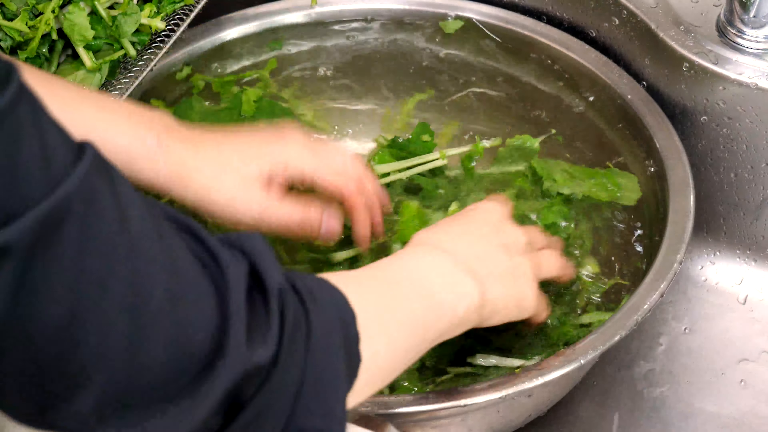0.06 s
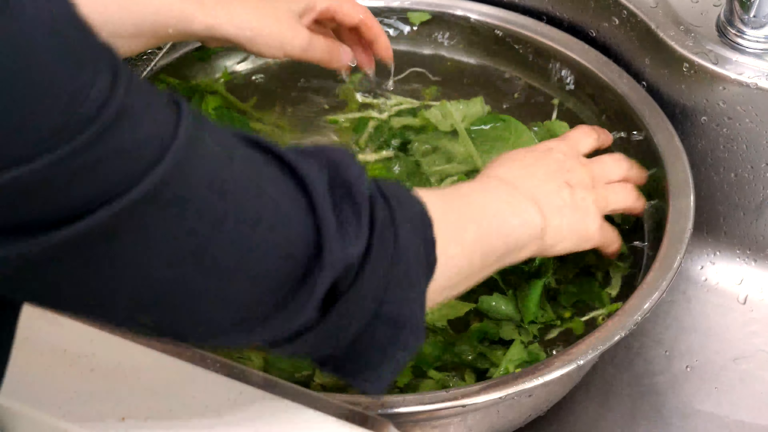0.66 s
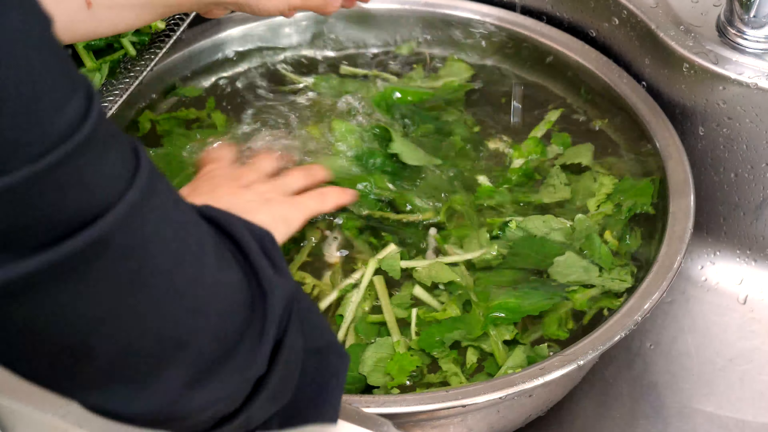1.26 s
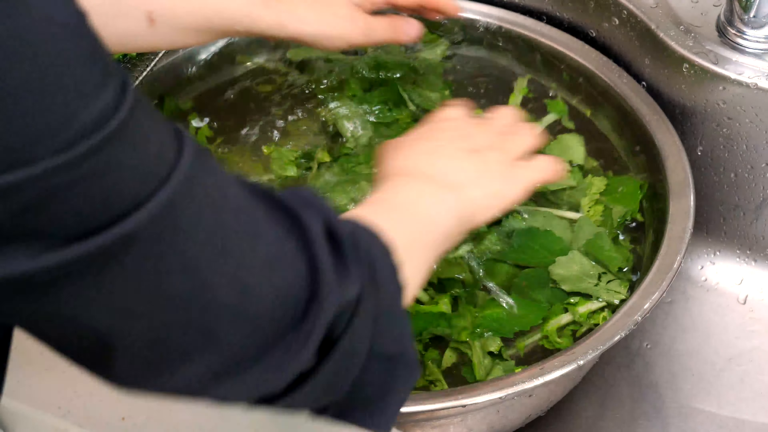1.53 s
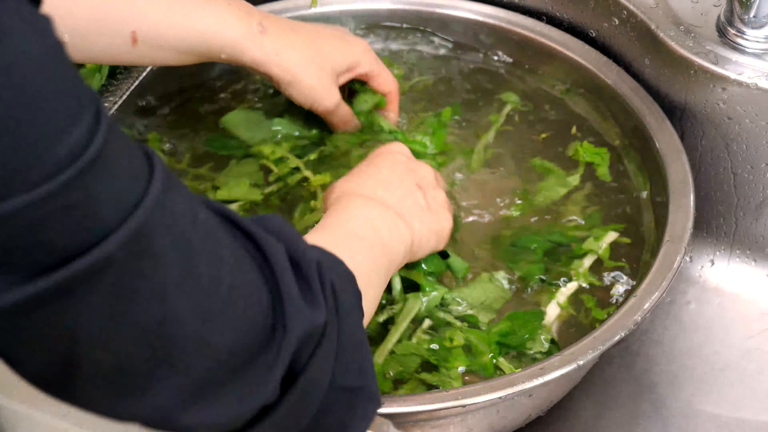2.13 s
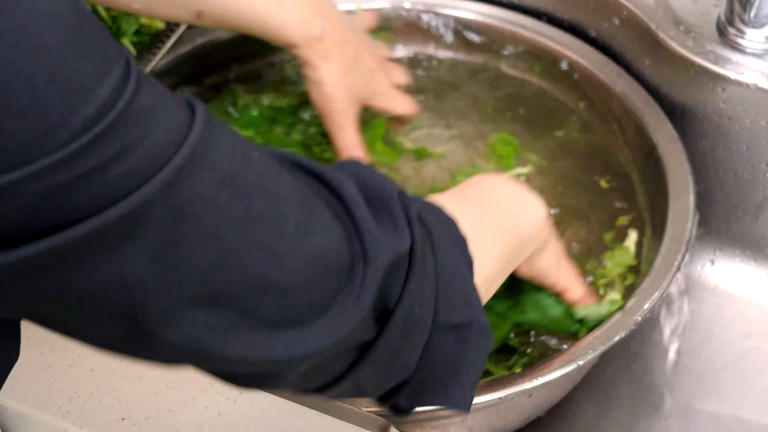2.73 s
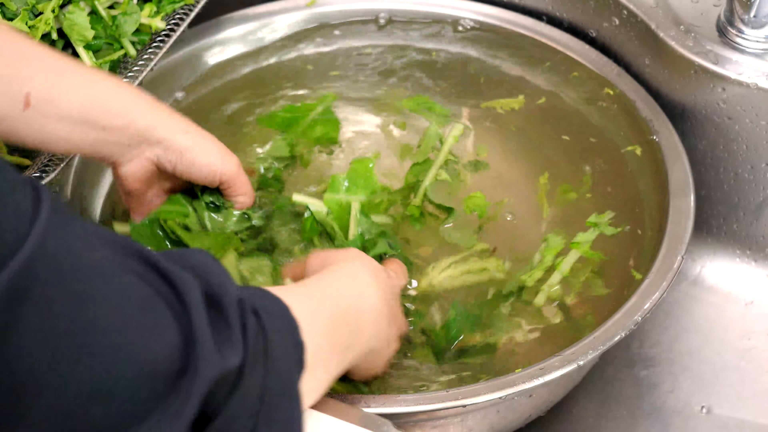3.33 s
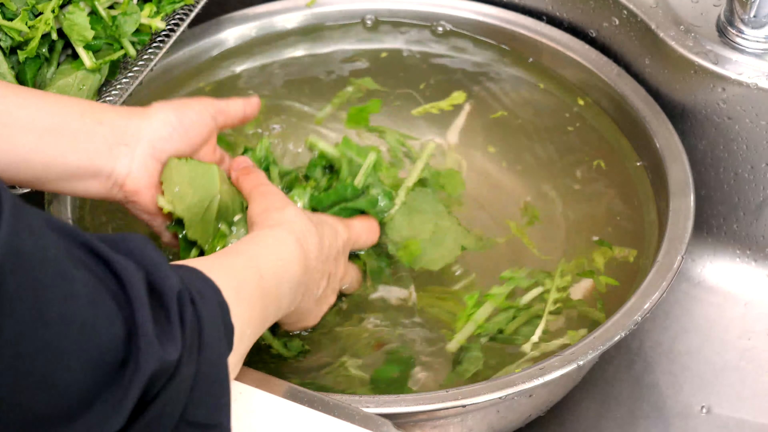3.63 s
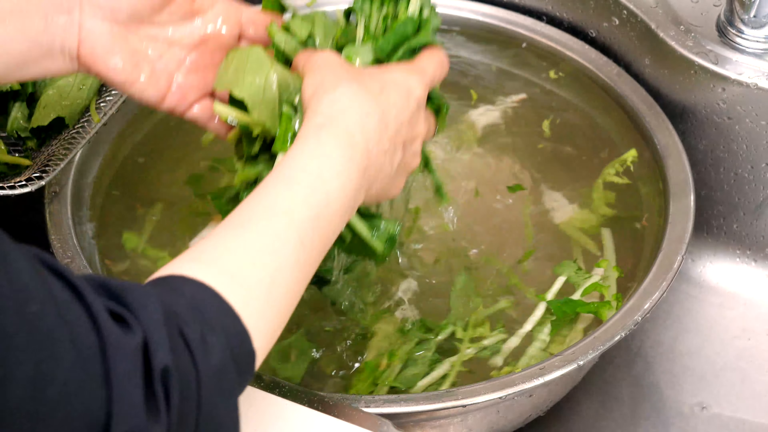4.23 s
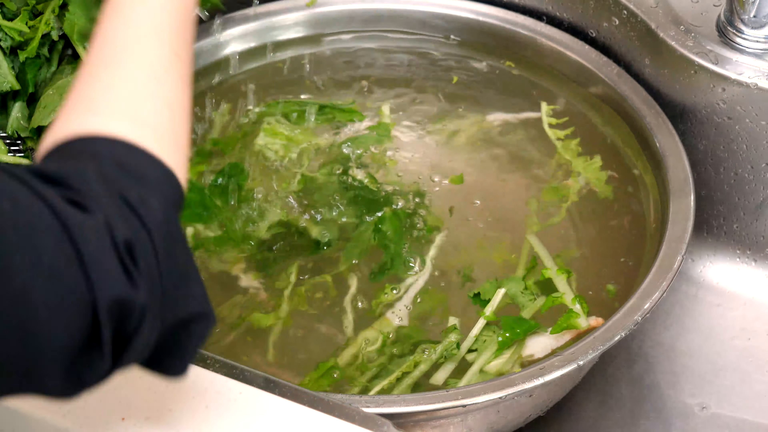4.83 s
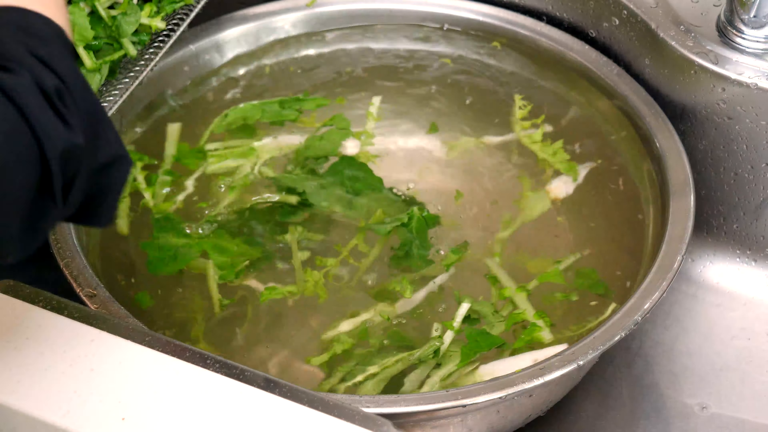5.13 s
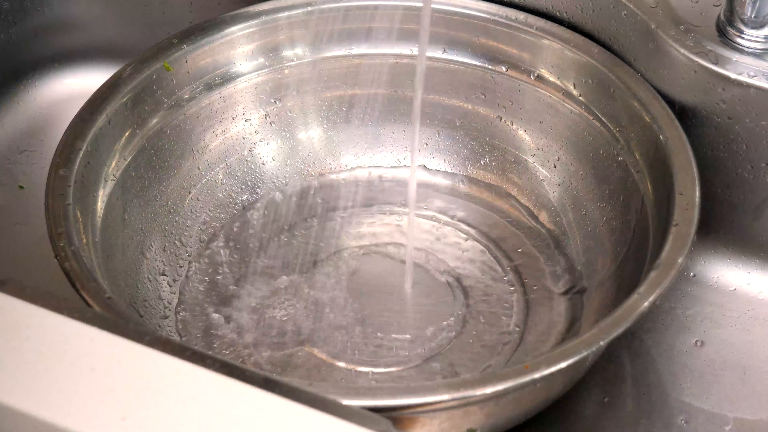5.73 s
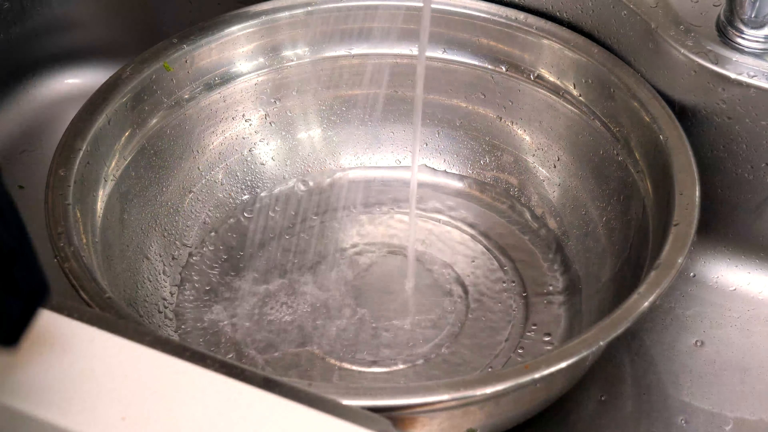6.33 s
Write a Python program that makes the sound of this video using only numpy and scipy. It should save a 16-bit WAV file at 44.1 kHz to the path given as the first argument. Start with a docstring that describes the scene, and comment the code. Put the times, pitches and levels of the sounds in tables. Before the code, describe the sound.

Close splashing, plopping and dripping as greens are washed by hand, switching abruptly to tap water drumming on a metal bowl.

```python
"""Kitchen sink, close, nearly mono: hands swish leafy greens in a steel bowl of water, then lift a
dripping bunch out. Trapped air rings as bubbles, the loudest plops clipping; spray ticks on leaves
and steel; the moving water rumbles in the bowl. Then, abruptly, a tap runs into the emptied bowl
and drums on its bottom."""
import sys
import numpy as np
from scipy import signal
from scipy.fft import rfft, irfft, next_fast_len
from scipy.io import wavfile
from scipy.ndimage import uniform_filter1d

SR = 44100
rng = np.random.default_rng(int(sys.argv[2]) if len(sys.argv) > 2 else 0)


def to_wav(sig):
    """Store sig (one row per channel, or 1-D mono) as 16-bit WAV at the path in sys.argv[1].

    Samples outside -1..1 are clipped; the rate is SR.
    """
    pcm = np.clip(np.atleast_2d(sig), -1, 1) * 32767
    pcm = np.round(pcm).astype(np.int16)
    wavfile.write(sys.argv[1], SR, pcm.T)  # frames by channels


N = 285327
TIME_S = np.arange(N) / SR
FREQS_HZ = np.maximum(np.fft.rfftfreq(next_fast_len(N), 1 / SR), 1)
TAP_ON_S = 5.353

# Table levels are relative.
# loudest bubbles: t/s, f/Hz, level/dB, swell/cycles
PLOPS = [(0.03, 2700, -17.5, 8.9), (0.362, 639, -13.5, 4), (0.396, 880, -15.5, 5.3), (0.449, 1350, -18, 10),
         (0.497, 3580, -9, 11.5), (0.509, 2190, -0.5, 0.81), (0.514, 1286, -9, 8), (0.613, 3466, -13.5, 20),
         (0.865, 3470, -7, 4), (0.885, 769, -10, 5), (0.933, 1127, -1, 2.7), (0.952, 1030, -18, 10),
         (1.015, 2530, -3.5, 3.5), (1.079, 868, -8, 1.6), (1.082, 1923, -2, 5.3), (1.091, 2910, -12.5, 7.3),
         (1.146, 3900, -10, 7), (1.185, 534, -10, 2.2), (1.199, 610, -7, 2.9), (1.238, 992, -8.5, 5),
         (1.275, 3320, -5, 4.7), (1.36, 735, -10, 1.64), (1.362, 3550, -4, 7.6), (1.41, 1059, -14, 17),
         (1.454, 642, -12.5, 5), (1.498, 1395, -5, 4.9), (1.575, 713, -10.5, 4.3), (1.665, 2530, -7, 2.2),
         (1.687, 3230, -9, 4.6), (1.712, 3670, -10.5, 5.3), (1.858, 2940, -5.5, 4),
         (1.969, 1220, -11.5, 1.9), (2.094, 3420, -12, 2), (2.14, 1860, -13.5, 4.6),
         (2.181, 4130, -10.5, 4.8), (2.47, 3330, -9.5, 5), (2.53, 3260, -11, 11), (2.546, 1550, -10, 4),
         (2.617, 4430, -11, 1.8), (2.638, 3700, -11.5, 10), (2.767, 1670, -16, 3),
         (2.808, 2510, -13.5, 2.2), (3.011, 2105, -6, 3.7), (3.033, 3570, -6.5, 2.95),
         (3.599, 1910, -14.5, 9), (3.608, 2850, -11, 10.8), (3.842, 1100, -17, 6.05),
         (4.065, 2254, -7, 7.2), (4.09, 3410, -8.5, 13), (4.184, 3870, -4.5, 8.2), (4.197, 1369, -4, 10),
         (4.237, 751, -8.5, 9.2), (4.254, 3900, -7, 4.3), (4.324, 666, -11, 8.2), (4.357, 661, -6, 6.6),
         (4.378, 3950, -6, 4.7), (4.406, 1102, -8, 5.1), (4.423, 4020, 2.5, 4.5), (4.649, 3890, -12, 15),
         (4.703, 2720, -10.5, 12), (4.755, 1490, -5, 2.34), (4.769, 1145, -6, 4.88),
         (4.781, 1110, -12.5, 10), (4.827, 2276, -10, 11), (4.834, 3144, -5, 4.8), (4.844, 3990, -4, 4.9),
         (4.941, 1330, -7, 3.07), (4.952, 1420, -5.5, 2.92)]
# hand swishes, gushes off the bunch: t/s, hold/s, gurgle/dB, splash/dB, spray/dB
HAND_SWISHES = [(0.0, 0.042, -29, -28.5, -37), (.32, 0.16, -25.5, -37, -34.5),
                (.5, 0.035, -23.5, -22.5, -31), (.83, .14, -23.5, -28.5, -35.5),
                (.87, 0.03, -41, -21.5, -26.5), (1.04, 0.094, -19, -23, -33), (1.19, 0.13, -20, -30.5, -34),
                (1.36, 0.075, -18.5, -18, -29), (1.5, 0.086, -21, -30, -33),
                (1.69, 0.027, -27, -25.5, -25.5), (1.84, 0.044, -24.5, -21, -25.5),
                (1.97, 0.012, -33, -42, -45), (2.1, 0.11, -39, -31, -53), (2.43, 0.048, -22, -33, -31),
                (2.53, 0.11, -26.5, -26, -34), (2.86, 0.029, -27.5, -30, -32),
                (3.21, 0.043, -33.5, -26.5, -35), (3.4, 0.0071, -24.5, -31, -69),
                (3.55, 0.034, -25.5, -28.5, -47), (3.67, 0.052, -21, -42, -49),
                (3.85, 0.043, -22, -28, -37), (4.05, 0.055, -28, -19.5, -23.5),
                (4.18, 0.22, -24, -19, -24.5), (4.58, 0.025, -27.5, -47, -31.5),
                (4.78, 0.063, -30, -26, -27.5), (4.95, 0.077, -31, -33, -29)]
# leaves rubbing and dripping between swishes: t/s, level/dB
LEAF_HANDLING = [(0.0, -41.5), (.2, -37.5), (.6, -27.5), (.78, -49), (1.0, -33), (2.0, -31), (2.75, -33),
                 (3.5, -30.5), (4.0, -25), (4.5, -24), (4.88, -34.5), (5.33, -28.5)]
# drops on leaves and steel: t/s, tick/dB, smack/dB
DROP_SLAPS = [(0.304, -17.5, -18.5), (0.3292, -17, -16), (0.542, -20, -31), (0.6125, -13, -13.5),
              (0.6894, -11, -19), (0.836, -13, -22), (0.864, -17, -19), (1.0124, -12.5, -11.5),
              (1.0476, -15, -35), (1.192, -15.5, -15), (1.361, -21, -19), (1.6854, -6.5, -18.5),
              (1.774, -32, -19), (1.857, -26, -9), (1.8932, -10.5, -27), (1.969, -32, -22.5),
              (2.0598, -40, -24), (2.0997, -19, -18.5), (2.156, -27, -34), (2.3083, -37, -23.5),
              (2.4477, -17, -43), (2.5474, -27, -18), (2.6163, -15, -13), (2.768, -41, -25),
              (2.855, -16, -25), (2.951, -13, -20.5), (3.012, -19.5, -13), (3.0334, -39, -27),
              (3.1338, -33, -20), (3.2119, -19, -19.5), (3.517, -37, -23.5), (3.609, -29, -20),
              (3.704, -18.5, -42), (3.8407, -14, -40), (4.165, -5.5, -16), (4.2934, -7, -19),
              (4.585, -18, -27), (4.6744, -16, -22), (4.7027, -34, -18.5), (4.737, -12.5, -43),
              (4.9142, -12.5, -26), (4.94, -13.5, -18.5), (5.0355, -6.5, -47), (5.1343, -15, -47)]
# arms shoving the water: t/s, hold/s, slosh/dB, surge/dB
ARM_SHOVES = [(.2, 0.29, -44, -26.5), (.71, 0.048, -36, -31), (.89, .03, -27, -43), (1.22, 0.087, -31, -35),
              (1.7, 0.085, -26.5, -31), (1.98, .08, -35, -31), (2.23, .09, -36, -40),
              (2.85, 0.14, -26, -30), (3.2, 0.2, -24, -39), (3.52, 0.065, -26, -28),
              (4.78, 0.069, -30, -43), (4.99, 0.07, -43, -37)]
# heave of the water: t/s, level/dB
WATER_HEAVE = [(0.0, -33.5), (.5, -30.5), (1.0, -40.5), (1.6, -35), (2.0, -31.5), (2.7, -28), (3.3, -29),
               (4.0, -26), (4.45, -36.5), (4.7, -32.5), (5.33, -24)]
# hands bumping the full bowl: t/s, f/Hz, level/dB
BOWL_BUMPS = [(0.22, 67, -36), (1.112, 70, -20), (1.639, 61.6, -19), (2.21, 63, -11.5), (2.859, 123, -14),
              (3.776, 118, -14.5), (3.928, 118, -15)]
# modes of the emptied bowl: f/Hz, width/Hz, level/dB
EMPTY_BOWL_MODES = [(157.6, 8, -24.5), (207, 18, -43), (260, 6.3, -36.5), (453, 13, -29.5),
                    (504, 31, -31.5), (805, 80, -37.5), (2588, 38, -37.5), (3400, 250, -33),
                    (3715, 78, -31.5), (3964, 110, -32), (4380, 200, -32.5), (5060, 140, -40)]
# jet sputters: t/s, level/dB
JET_SPUTTERS = [(5.3803, -8.5), (5.45, -10), (5.5772, -7), (5.6045, -5), (5.728, -15), (5.8862, -4),
                (5.9234, -11), (6.142, -7.5), (6.2286, -8), (6.273, -3), (6.389, -8)]

# spectra: f/Hz, level/dB
CHURN_EQ = [(300, -26), (600, -13.5), (1300, 1), (1800, -3.5), (2800, -36)]  # stirred water
RUSTLE_EQ = [(900, -30), (1700, -2.5), (2600, -1.5), (3800, 4.5), (4500, -3.5), (6000, -19.5)]  # wet leaves
SPRAY_EQ = [(1200, -13), (2500, -22), (4000, -0.5), (5200, -0.5), (7500, -2), (11000, -3.5), (15500, -10.5)]  # fine drops
SMACK_EQ = [(400, -14), (1200, -9), (2500, 1), (3800, 7), (4500, -0.5), (6000, -16)]  # dull part of a slap
SLOSH_EQ = [(70, -43), (100, 2), (140, -11.5), (200, 0), (260, 0), (330, -8.5), (500, -7.5), (900, -40),
            (2000, -46)]  # water against the wall
SURGE_EQ = [(15, -40), (28, 1), (42, 2.5), (62, 7.5), (85, 8.5), (120, -29)]  # deep rocking
JET_EQ = [(18, -51), (30, -29), (53, -8), (97, -14), (156, 1), (299, -21), (467, -7), (673, -20),
          (852, -11), (996, -18.5), (1910, -24), (3780, -18), (4780, -24.5), (9680, -19.5), (15500, -20.5)]  # jet on steel
BASIN_EQ = [(650, -18), (1050, -3), (1500, -4), (2200, -7), (3000, -22)]  # air in the bowl
KITCHEN_EQ = [(18, -39), (30, -11), (113, 11), (167, -40), (698, 22), (2770, -52), (3590, 12), (4900, -38),
              (15000, -49)]  # room noise
SIDE_EQ = [(30, -17), (125, -31), (250, -15.5), (1000, -24.5), (2000, -28), (4000, -24.5), (8000, -18)]  # left-right difference
SPUTTER_EQ = [(1500, -17.5), (3000, -9.5), (3700, 7.5), (4300, -6), (5200, -5.5), (12000, -20)]


def plops(main_db, linger_db, shed_db, shed_count):
    """Plunging hands and falling water trap large bubbles; each lingers and sheds lesser ones."""
    out = np.zeros(N)
    for (s, hz, db, swell), shed in zip(PLOPS, rng.random((len(PLOPS), shed_count, 2))):
        swell = max(swell, 0.5)
        fade = 3.7 * (hz / 1000) ** 0.31  # cycles
        add(out, s, undb(db + main_db) * bubble(hz, swell, fade, glide=0.035))
        linger = bubble(hz, fade, 2.9 * fade, glide=0.012)
        add(out, s + (swell + fade) / hz, undb(db + linger_db) * linger)
        for late, scatter in shed:  # later fragments: smaller, weaker
            octaves = 0.69 * (scatter - 0.5) + 0.35 * late
            fragment = bubble(hz * 2 ** octaves, swell_cycles=1, fade_cycles=2.7, glide=0.022)
            add(out, s + (swell + 32 * late) / hz, undb(db + shed_db - 17.5 * late) * fragment)
    return out


def bubble(hz, swell_cycles, fade_cycles, glide):
    """An air pocket swells as it pinches off, then rings down, rising in pitch near the surface."""
    cycle = np.arange(int((swell_cycles + 6 * fade_cycles) * SR / hz)) * hz / SR
    after = cycle - swell_cycles
    envelope = np.minimum(cycle / swell_cycles, 1) * np.exp(-np.maximum(after, 0) / fade_cycles)
    bend = glide * after ** 2 / (2 * (swell_cycles + fade_cycles))
    return envelope * np.sin(2 * np.pi * (cycle + bend))


def swishing():
    """Stirred leaves fold air into the water, rub together and flick off spray."""
    handling = np.outer(undb([-0.5, -1, -9]), gain_curve(LEAF_HANDLING))
    swishes = strokes(HAND_SWISHES, attack_s=0.036, release_s=0.032)
    gurgle, splash, spray = np.hypot(handling, swishes)
    huge = swarm(low_hz=554, high_hz=909, fade_cycles=7.4, spread_db=7, count=700)
    large = swarm(low_hz=777, high_hz=1914, fade_cycles=4.6, spread_db=9.5, count=1600)
    small = swarm(low_hz=1756, high_hz=4520, fade_cycles=8.9, spread_db=8, count=2600)
    fizz = swarm(low_hz=4800, high_hz=14500, fade_cycles=12, spread_db=5, count=1300)
    churn = crackle(CHURN_EQ, per_s=2500, spread_db=6)
    rustle = crackle(RUSTLE_EQ, per_s=2000, spread_db=-0.5)
    mist = crackle(SPRAY_EQ, per_s=1500, spread_db=1)
    # trapping air takes vigour, the biggest pockets most
    vigour = np.minimum((gurgle + splash) / undb(-18.5), 1) ** 0.64
    glug = np.minimum(gurgle / undb(-15), 1)
    return (gurgle * (undb(-4) * glug * huge + undb(-8.5) * vigour * large + undb(-7) * churn)
            + splash * (undb(-1.5) * vigour * small + undb(-4) * rustle)
            + spray * (undb(-4.5) * fizz + undb(-2.83) * mist))


def swarm(low_hz, high_hz, fade_cycles, spread_db, count):
    """Bubbles of mixed size and depth, rms 1."""
    out = np.zeros(N)
    for (when, pitch, depth), loud in zip(rng.random((count, 3)), rng.standard_normal(count)):
        hz = low_hz * (high_hz / low_hz) ** pitch
        ring = bubble(hz, 0.73, fade_cycles * (0.5 + depth), glide=0.02)
        add(out, when * N / SR, undb(spread_db * loud) * ring)
    return even(out, span_s=0.057)


def crackle(eq, per_s, spread_db):
    """Dense wet clicks in small flurries, rms 1."""
    flurries = undb(5.1 * walk(rate_hz=97))
    return even(colour(patter(per_s, spread_db) * flurries, eq), span_s=0.058)


def slaps(crack_s, tick_decay_s, smack_decay_s, tail_db):
    """Each drop bursts into a bright tick, a duller smack and the ping of a tiny bubble."""
    ticks, smacks, pings = np.zeros((3, N))
    t = TIME_S[:2048]
    crack = np.exp(-t / crack_s)
    tick_envelope = crack + undb(tail_db) * np.exp(-t / tick_decay_s)
    smack_envelope = crack + undb(tail_db) * np.exp(-t / smack_decay_s)
    ping_hz = 5360 * (9580 / 5360) ** rng.random(len(DROP_SLAPS))
    noises = rng.standard_normal((len(DROP_SLAPS), 2, len(t)))
    for (s, tick_db, smack_db), hz, noise in zip(DROP_SLAPS, ping_hz, noises):
        add(ticks, s, undb(tick_db) * noise[0] * tick_envelope)
        add(smacks, s, undb(smack_db) * noise[1] * smack_envelope)
        add(pings, s, undb(tick_db) * bubble(hz, swell_cycles=1, fade_cycles=20, glide=0.013))
    return (undb(-4.5) * colour(ticks, SPRAY_EQ) + undb(6.5) * colour(smacks, SMACK_EQ)
            + undb(-8.5) * pings)


def tap():
    """An aerated jet spatters on bare steel and drums the bowl's modes; stray drops tick on the wall."""
    impacts = patter(per_s=9000, spread_db=4.5) * undb(2.4 * walk(rate_hz=110))
    spatter = even(colour(impacts, JET_EQ), span_s=0.224)
    # sputters drive the modes harder
    pushes = [(s, 0.012, db + 11.5) for s, db in JET_SPUTTERS]
    drive = 4 + strokes(pushes, attack_s=0.025, release_s=0.016)[0]
    ring = np.zeros(N)
    for hz, width_hz, db in EMPTY_BOWL_MODES:
        drumming = drive * patter(per_s=900, spread_db=6)
        ring += undb(db) * even(resonate(drumming, hz, width_hz), span_s=0.34)
    ticks = even(colour(patter(per_s=500, spread_db=4), SPRAY_EQ), span_s=0.17)
    running = np.clip((TIME_S - TAP_ON_S) / 0.0024, 0, 1)
    return running * (undb(-17.5) * spatter + undb(-27.5) * ticks + undb(-0.5) * ring)


def sputters(decay_s, gain_db):
    """Drops flung by the jet ring the steel near 3.7 kHz."""
    out, t = np.zeros(N), TIME_S[:4096]
    for s, db in JET_SPUTTERS:
        add(out, s, undb(db + gain_db) * rng.standard_normal(len(t)) * np.exp(-t / decay_s))
    return colour(out, SPUTTER_EQ)


def sloshing():
    """Heaving water pushes unevenly on the full bowl, which booms at its lowest mode."""
    slosh, surge = strokes(ARM_SHOVES, attack_s=0.037, release_s=0.017)
    slosh = np.hypot(slosh, gain_curve(WATER_HEAVE))
    surge = np.hypot(surge, undb(-36))  # rocks on between shoves
    wall = even(colour(patter(per_s=260, spread_db=4), SLOSH_EQ), span_s=0.18)
    boom = even(resonate(rng.standard_normal(N), hz=118, width_hz=10), span_s=0.2)
    deep = even(colour(rng.standard_normal(N), SURGE_EQ), span_s=0.072)
    return slosh * (undb(-5.5) * wall + undb(-1) * boom) + undb(-2.5) * surge * deep


def bumps():
    """Hands bump the full bowl, which thuds: low damped sines."""
    out = np.zeros(N)
    for s, hz, db in BOWL_BUMPS:
        add(out, s, undb(db) * bubble(hz, swell_cycles=0.29, fade_cycles=2.3, glide=0))
    return out


def basin(x, gain_db, t60_s):
    """Plops ring on between the steel walls."""
    ring = signal.oaconvolve(x, tail(delay_s=0.01, t60_s=t60_s))[:N]
    return undb(gain_db) * colour(ring, BASIN_EQ)


def echoes(x, places):
    """The sink answers first, the kitchen later; each place a splash lands has its own echoes."""
    place = rng.integers(places, size=N // 1024 + 1).repeat(1024)[:N]
    out = np.zeros(N)
    for k in range(places):
        sink = undb(-8) * tail(delay_s=0.0027, t60_s=0.046)
        kitchen = undb(-11) * tail(delay_s=0.012, t60_s=0.17)
        share = uniform_filter1d(1.0 * (place == k), size=256)
        out += signal.oaconvolve(x * share, sink + kitchen)[:N]
    return signal.sosfilt(signal.butter(1, [350, 12000], "band", fs=SR, output="sos"), out)


def stereo_width(mid, lag_s):
    """A faint, fluttering left-right difference that slightly widens the nearly mono sound."""
    delayed = np.interp(TIME_S - lag_s, TIME_S, mid)
    return colour(delayed * walk(rate_hz=40), SIDE_EQ)


def kitchen_noise():
    """Faint steady room noise."""
    return undb(-53) * unit(colour(rng.standard_normal(N), KITCHEN_EQ))


def strokes(table, attack_s, release_s):
    """Movements build, hold and settle; one gain curve per dB column, overlaps adding in power."""
    power = 0
    for s, hold_s, *db in table:
        age_s = TIME_S - s
        envelope = np.exp(np.minimum(age_s, 0) / attack_s - np.maximum(age_s - hold_s, 0) / release_s)
        power = power + np.outer(undb(db), envelope) ** 2
    return np.sqrt(power)


def patter(per_s, spread_db):
    """Randomly timed impacts of varied size."""
    hits = rng.random(N) < per_s / SR
    return hits * rng.choice([-1, 1], N) * undb(spread_db * rng.standard_normal(N))


def tail(delay_s, t60_s):
    """Diffuse echo, unit energy."""
    t = TIME_S[:SR // 2]
    echo = rng.standard_normal(len(t)) * undb(-60 * t / t60_s) * (t > delay_s)
    return echo / np.sqrt(np.sum(echo ** 2))


def walk(rate_hz):
    """Smooth random wander, rms 1."""
    knots = rng.standard_normal(2048)
    return unit(np.interp(TIME_S * rate_hz, np.arange(len(knots)), knots))


def resonate(x, hz, width_hz):
    """One resonance, rms 1."""
    return unit(signal.lfilter(*signal.iirpeak(hz, hz / width_hz, fs=SR), x))


def colour(x, eq):
    """Filter by an (f/Hz, level/dB) spectrum."""
    hz, db = np.transpose(eq)
    size = next_fast_len(N)
    response = undb(np.interp(np.log(FREQS_HZ), np.log(hz), db))
    return irfft(rfft(x, size) * response, size)[:N]


def gain_curve(table):
    """(t/s, level/dB) to gain per sample."""
    s, db = np.transpose(table)
    return undb(np.interp(TIME_S, s, db))


def even(x, span_s):
    """Rms 1 over each span_s; quicker grain stays."""
    return x / np.sqrt(uniform_filter1d(x ** 2, int(span_s * SR)) + 1e-12)


def add(out, s, sound):
    """Mix in at time s."""
    start = int(np.clip(s * SR, 0, N - 1))
    out[start:start + len(sound)] += sound[:N - start]


def unit(x):
    """Scale to rms 1."""
    return x / np.sqrt(np.mean(x ** 2))


def undb(db):
    """Decibels to gain."""
    return 10 ** (np.asarray(db) / 20)


def scene():
    """Washing, then the tap, echoed by sink and kitchen."""
    washing = np.clip((TAP_ON_S - TIME_S) / 0.0064 + 1, 0, 1)
    bubbles = plops(main_db=3.5, linger_db=-18, shed_db=0.5, shed_count=5)
    drops = slaps(crack_s=0.0033, tick_decay_s=0.02, smack_decay_s=0.0071, tail_db=-3.5)
    water = bubbles + basin(bubbles, gain_db=-10, t60_s=0.28) + drops + washing * swishing()
    water += tap() + sputters(decay_s=0.0054, gain_db=7)
    mid = water + kitchen_noise() + echoes(water, places=4) + bumps() + washing * sloshing()
    side = stereo_width(mid, lag_s=0.00125)
    return np.array([mid + side, mid - side])


def record(dry):
    """Clip at full scale; low-pass at 15.75 kHz."""
    lowpass = signal.ellip(10, 0.1, 70, 15750, fs=SR, output="sos")
    return signal.sosfilt(lowpass, np.clip(dry, -1, 1))


dry = scene()
out = record(dry)
to_wav(out)
```